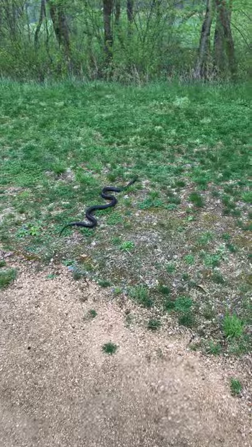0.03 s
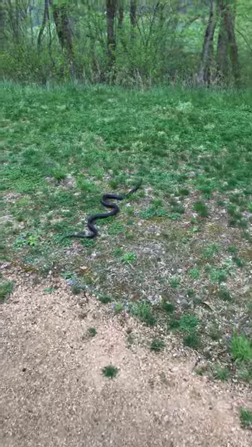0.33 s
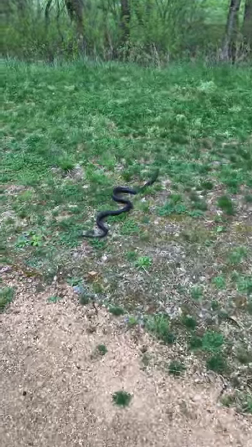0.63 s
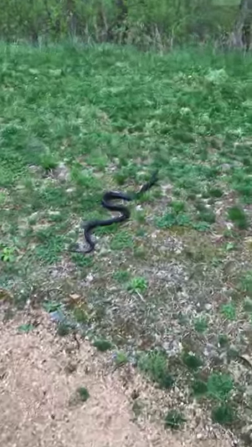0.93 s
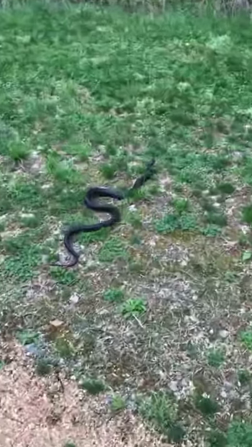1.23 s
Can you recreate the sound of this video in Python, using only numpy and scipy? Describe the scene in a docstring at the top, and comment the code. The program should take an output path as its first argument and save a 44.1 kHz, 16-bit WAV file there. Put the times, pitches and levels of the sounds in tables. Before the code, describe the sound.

Gravel crunches and clicks under slow steps that come to a stop in light wind.

```python
"""A slow walk over gravel and dry grass, coming to a stop.
Light wind cuts in first, rumbling on the microphone over rustling leaves and a thin, crackly hiss.
Then each step presses out a swell of crunching grit, while single stones knock and snap under the soles.
Near the end a faint drone fades in, and a last soft crunch brings the feet to rest."""
import sys
import numpy as np
from scipy.fft import rfft, irfft, next_fast_len
from scipy.io import wavfile
from scipy.ndimage import map_coordinates

SR = 44100
rng = np.random.default_rng(int(sys.argv[2]) if len(sys.argv) > 2 else 0)


def materialize(psi):
    """Save the field psi as 16-bit PCM at rate SR to the path in sys.argv[1].

    A 1-D psi becomes a single channel; in a 2-D psi each row is a channel.
    """
    bounded = np.clip(np.atleast_2d(psi).T, -1, 1)
    quanta = np.round(bounded * 32767).astype(np.int16)
    wavfile.write(sys.argv[1], SR, quanta)


N = 176400
T = np.arange(N) / SR


def amp(db):
    """Decibels to gain."""
    return 10 ** (np.asarray(db) / 20)


def unit(x):
    """Scale to rms 1."""
    return x / np.sqrt(np.mean(x ** 2) + 1e-20)


def filtered(x, response):
    """Zero-phase EQ: response gives the gain at each frequency in Hz."""
    size = next_fast_len(N + 8192)
    return irfft(rfft(x, size) * response(np.fft.rfftfreq(size, 1 / SR)), size)[:N]


def coloured(x, eq):
    """Shape x with an EQ curve of (f/Hz, level/dB) points, then scale to rms 1."""
    f, db = np.transpose(eq)
    return unit(filtered(x, lambda hz: amp(np.interp(np.log(hz + 1), np.log(f), db))))


def wobble(per_s):
    """A smooth random drift through per_s points a second."""
    return map_coordinates(rng.standard_normal(1024), [T * per_s], mode="wrap")


def burst(t, attack_s):
    """Envelope of one contact: a fast attack up to 1 at t = 0, then a slower fade."""
    age = np.maximum(t / attack_s + 1, 0)
    return age * np.exp(1 - age)


def impulses(per_s, scatter_db):
    """Raw crackle: random clicks of uneven size and either polarity."""
    size = amp(scatter_db * np.minimum(rng.exponential(size=N), 3))
    return (rng.random(N) < per_s / SR) * size * rng.choice([-1, 1], N)


def air():
    """The bed: wind rumbles on the microphone, distant leaves rustle, a high hiss crackles finely."""
    # level ride of the three layers: t/s, rumble/dB, leaves/dB, hiss/dB
    ride = [(.27, -45, -51, -55.5), (.9, -46.5, -53, -51.5), (1.5, -42, -50, -48.5),
            (2.05, -48, -52, -49.5), (2.55, -46, -54.5, -48.5), (3.1, -45, -52.5, -50.5),
            (3.55, -43, -53, -48.5), (4, -43.5, -52, -49)]
    # low-end weight of the wind: f/Hz, level/dB
    rumble_eq = [(10, -3), (25, -5), (39, 2), (52, -0.5), (70, 0), (100, -9.5), (150, -14), (230, -15.5),
                 (330, -22.5), (500, -39.5), (1200, -63), (4000, -88)]
    # midrange rustle of the leaves: f/Hz, level/dB
    leaves_eq = [(100, -26), (400, -6), (560, -2.5), (720, -4), (950, 0), (1300, 0.5), (2000, -5),
                 (4000, -5.5), (6000, -8.5), (15000, -12.5)]
    # airy top of the hiss and its crackle: f/Hz, level/dB
    hiss_eq = [(500, -4), (2500, -6), (5500, -7), (8000, -7), (10000, -6), (12000, -3.5), (14500, -0.5),
               (16000, 2.5)]
    times, *levels = np.transpose(ride)
    rumble_db, leaves_db, hiss_db = [np.interp(T, times, db) for db in levels]
    rumble = amp(rumble_db + 0.99 * wobble(per_s=8.81)) * coloured(rng.standard_normal(N), rumble_eq)
    leaves = amp(leaves_db + 0.81 * wobble(per_s=17)) * coloured(rng.standard_normal(N), leaves_eq)
    hiss = coloured(rng.standard_normal(N), hiss_eq)
    crackle = amp(-0.5) * coloured(impulses(per_s=400, scatter_db=4.5), hiss_eq)
    return rumble + leaves + amp(hiss_db + 1.4 * wobble(per_s=40)) * (hiss + crackle)


def gravel(pitch_hz, spread, sizes=9, attack_cycles=0.54):
    """Small stones of several sizes collide, each ringing for a cycle or two around one pitch."""
    t = np.arange(300) / SR
    hits = impulses(per_s=2200, scatter_db=5)
    size = rng.integers(sizes, size=N)
    onsets = np.flatnonzero(hits)
    hz = pitch_hz * np.exp(spread * rng.standard_normal(N)[onsets, None])
    attack_s = attack_cycles / hz * (1 / 2 + size[onsets, None] / sizes)
    rings = hits[onsets, None] * burst(t - attack_s, attack_s) * np.sin(2 * np.pi * hz * t)
    positions = onsets[:, None] + np.arange(len(t))
    return unit(np.bincount(positions.ravel(), rings.ravel(), N + len(t))[:N])  # overlap-add


def footsteps():
    """Weight comes on and off the sole; gravel crunches and finer grit crackles with it."""
    # shoe pressing on gravel: peak t/s, rise/s, fall/s, level/dB, gravel f/Hz,
    # pitch spread/natural-log units, grit level/dB relative to the gravel
    steps = [(0.349, .035, 0.026, -44.5, 1600, 0.33, -6.5), (.402, 0.026, 0.031, -46.5, 1530, 0.11, -7),
             (.64, 0.18, 0.084, -57, 1730, 0.3, -13), (1.205, 0.0059, 0.021, -36, 3000, 0.27, -8.5),
             (1.33, 0.088, 0.063, -51.5, 2900, 0.2, -12), (1.45, 0.15, 0.091, -48, 1400, 0.19, -3),
             (2.106, .015, 0.026, -40, 1630, 0.37, -4.5), (2.2, 0.083, 0.22, -48.5, 1320, 0.091, -7),
             (2.712, 0.0082, .03, -45, 1220, 0.39, 0), (2.76, 0.019, 0.016, -35, 1590, 0.46, -7.5),
             (3.84, 0.22, 0.11, -55, 2110, 0.37, 0)]
    # tone of the fine grit: f/Hz, level/dB
    grit_eq = [(100, -27), (250, 18), (600, -23.5), (2000, 3), (4000, 2.5), (5500, -3.5), (9000, 0),
               (15000, -16.5)]
    out = np.zeros(N)
    for peak_s, rise_s, fall_s, db, pitch_hz, spread, grit_db in steps:
        from_peak = abs(T - peak_s) / np.where(T < peak_s, rise_s, fall_s)
        pressure = np.exp(-from_peak * np.minimum(from_peak, 1))  # round top, exponential tails
        grit = coloured(impulses(per_s=6600, scatter_db=3), grit_eq)
        out += amp(db) * pressure * (gravel(pitch_hz, spread) + amp(grit_db) * grit)
    return out


def stones():
    """A stone slips under the sole: a hollow knock, a brighter snap and a sharp tick."""
    # single stones shifting: t/s, knock f/Hz, knock level/dB, snap level/dB, tick f/Hz, tick level/dB
    slips = [(0.3448, 1530, -36, -33, 7000, -54), (.4278, 1440, -30, -36, 7000, -54),
             (0.5891, 1500, -45, -43, 9500, -31), (.643, 1750, -34.5, -34, 7000, -50),
             (0.6868, 1730, -32.5, -37, 13000, -44), (.707, 1540, -36.5, -35.5, 7000, -48),
             (0.737, 1500, -53, -49, 8000, -30), (.819, 1430, -22.5, -32.5, 10000, -51),
             (1.0504, 1700, -28, -34, 8000, -46), (1.1718, 1380, -33.5, -46, 8000, -44),
             (1.2005, 1200, -33, -30, 7000, -43), (1.2174, 1700, -36, -28, 6000, -29),
             (1.288, 2540, -30, -51, 7000, -48), (1.348, 1500, -37, -32, 8000, -27),
             (1.365, 1300, -31, -35, 7000, -50), (1.4049, 1380, -26, -46, 7000, -46),
             (1.439, 1800, -27, -34, 7000, -51), (1.4795, 1580, -25.5, -47, 7000, -46),
             (1.4935, 1540, -26.5, -27.5, 7000, -48), (1.521, 1280, -29.5, -45, 11000, -24),
             (1.563, 1150, -35.5, -51, 12000, -37), (1.6091, 1500, -34.5, -26.5, 5940, -24),
             (1.6363, 1400, -30, -26.5, 5500, -29), (1.7031, 1310, -33, -39, 14000, -28),
             (1.8195, 2280, -29, -37, 7000, -46), (2.05, 1700, -32, -32, 7000, -31),
             (2.0732, 1520, -25.5, -36, 7000, -39), (2.0954, 1700, -29, -32, 7000, -43),
             (2.1015, 1330, -27, -31, 7000, -46), (2.2876, 1340, -27.5, -36, 7000, -50),
             (2.2961, 1260, -28.5, -39, 7000, -48), (2.347, 1470, -37, -26.5, 6460, -23.5),
             (2.6644, 1310, -40, -35, 8000, -34), (2.687, 1200, -28, -30, 14500, -20.5),
             (2.7021, 1510, -27, -41, 12000, -24), (2.7134, 1200, -43, -41, 9000, -36),
             (2.7219, 1200, -27.5, -44, 7000, -46), (2.7257, 990, -29.5, -35, 12000, -18.5),
             (2.7602, 1200, -28, -34.5, 7000, -42), (2.7651, 1480, -28, -34, 6950, -40),
             (2.8353, 1660, -34, -36, 6000, -42), (2.965, 1070, -38, -40, 7000, -50),
             (3.2868, 2450, -34, -33, 7000, -55), (3.5311, 2730, -30.5, -37, 11000, -47),
             (3.6774, 2740, -28.5, -35, 7000, -42), (3.786, 1020, -36.5, -36, 7000, -43),
             (3.949, 1500, -55, -48, 13000, -33)]
    snap_hz, tick_width_octaves = 3750, 0.82
    t = np.arange(-100, 400) / SR
    bins_hz = np.fft.rfftfreq(len(t), 1 / SR) + 1
    out = np.zeros(N)
    for at_s, knock_hz, knock_db, snap_db, tick_hz, tick_db in slips:
        knock = burst(t, attack_s=0.56 / knock_hz) * np.sin(2 * np.pi * knock_hz * t)
        snap = burst(t, attack_s=0.00017) * np.cos(2 * np.pi * snap_hz * t + rng.normal(0, 0.95))
        tick_noise = burst(t, attack_s=0.00041) * rng.choice([-1, 1], len(t))
        tick_band = np.exp(-(np.log2(bins_hz / tick_hz) / tick_width_octaves) ** 2 / 2)
        tick = irfft(rfft(tick_noise) * tick_band)
        tick *= 2 / np.linalg.norm(tick)
        start = round((at_s + t[0]) * SR)
        out[start:start + len(t)] += amp(knock_db) * knock + amp(snap_db) * snap + amp(tick_db) * tick
    return out


def drone(start_s=3.22, fade_s=0.16):
    """Two narrow, unsteady bands of noise fade in, faint among the leaves."""
    # far drone: f/Hz, width/Hz, level/dB
    bands = [(515, 19, -67), (584, 19, -65)]
    out = np.zeros(N)
    for f, width, db in bands:
        band = filtered(rng.standard_normal(N), lambda hz: np.exp(-((hz - f) / width) ** 2))
        out += amp(db) * unit(band)
    return out * np.clip((T - start_s) / fade_s, 0, 1)


def scene():
    """Feet, air and drone in one mono mix."""
    return (footsteps() + stones() + air() + drone())[None]


def record(dry, start_s=0.271, cutoff_hz=15850):
    """The sound cuts in abruptly, through a microphone with a few treble dips and a steep high cut."""
    # dips in the microphone's response: f/Hz, width/Hz, level/dB
    notches = [(4880, 360, -4), (10500, 450, -3.5), (7800, 400, -1.5)]

    def microphone(hz):
        dips_db = sum(db * np.exp(-((hz - f) / width) ** 2) for f, width, db in notches)
        high_cut = np.clip((cutoff_hz - hz) / 100 + 1 / 2, 0, 1)
        return amp(dips_db) * high_cut

    return filtered(dry[0] * (T > start_s), microphone)[None]


dry = scene()
out = record(dry)
materialize(out)
```